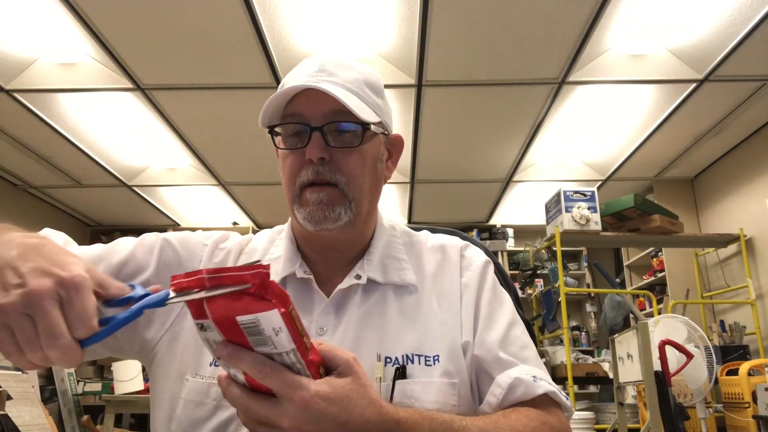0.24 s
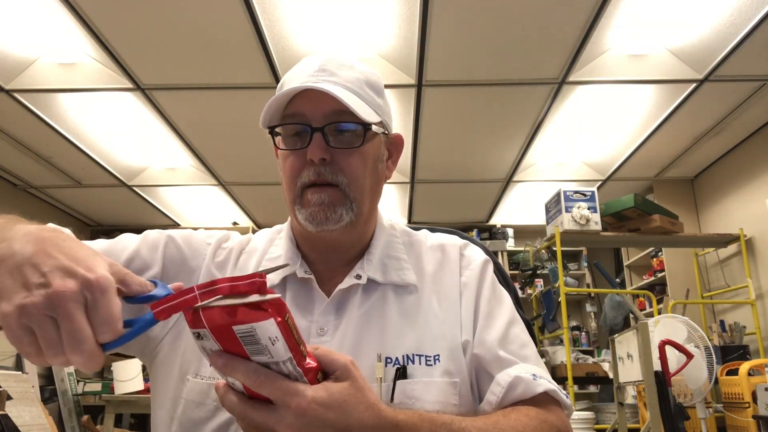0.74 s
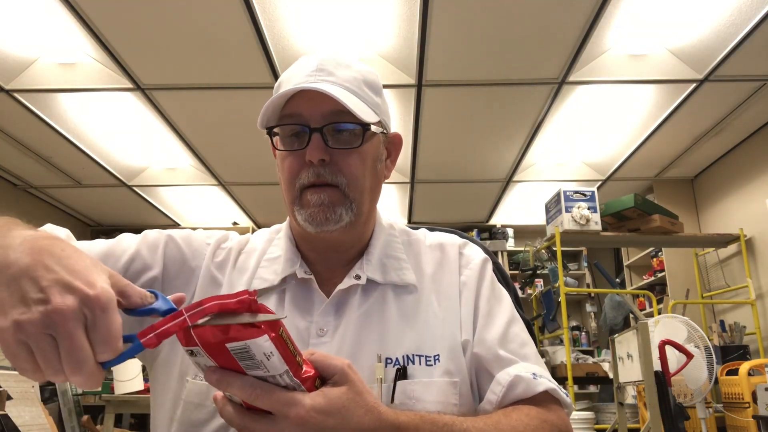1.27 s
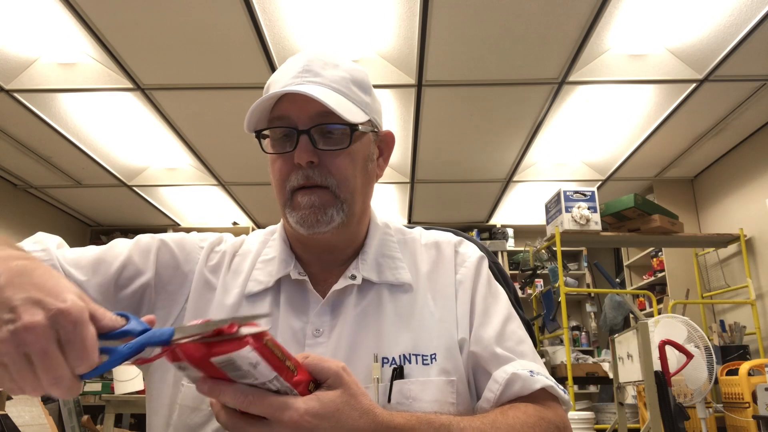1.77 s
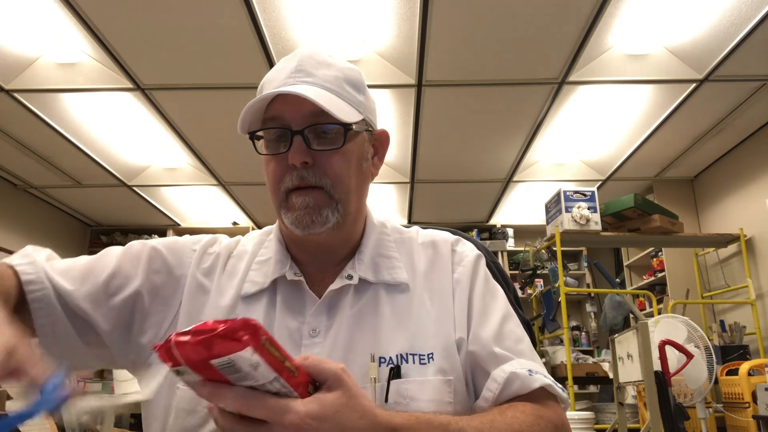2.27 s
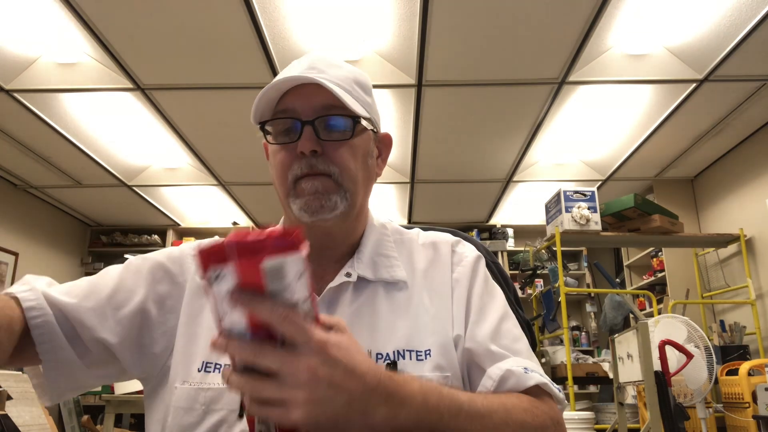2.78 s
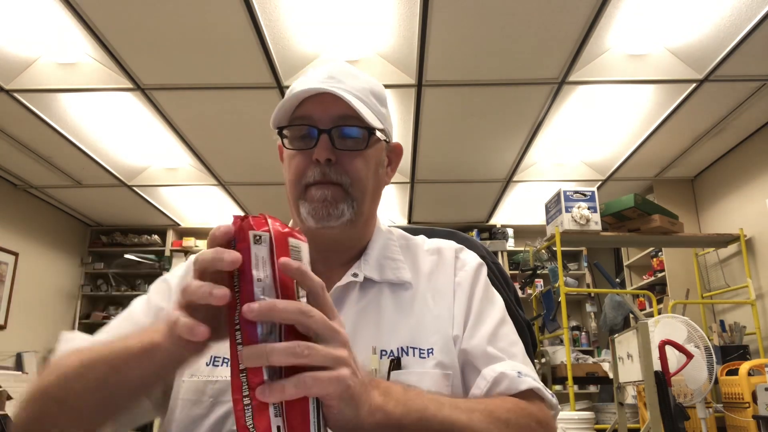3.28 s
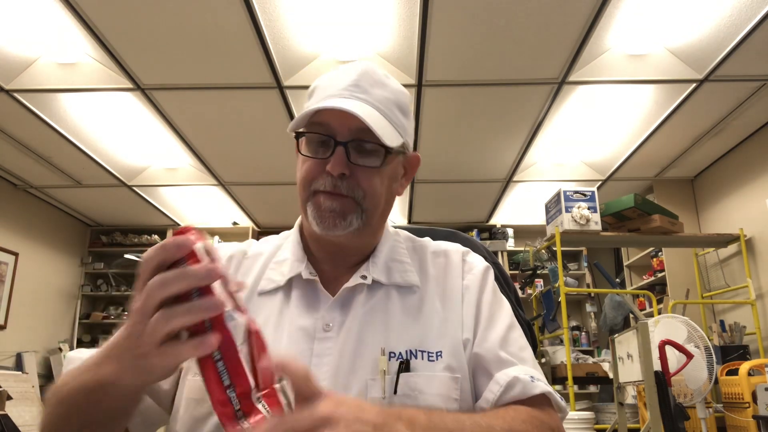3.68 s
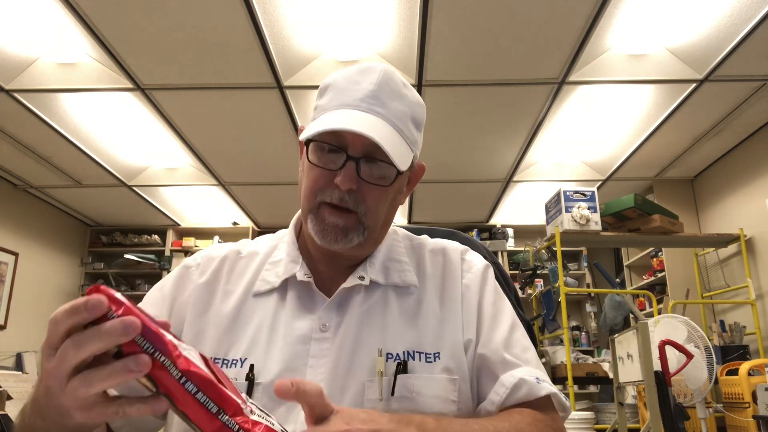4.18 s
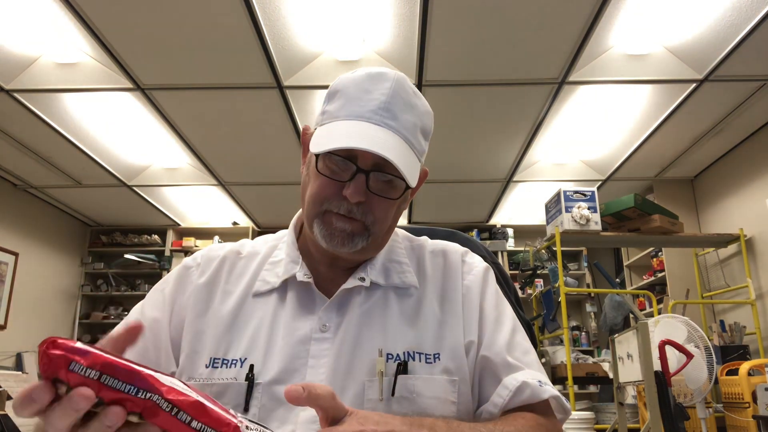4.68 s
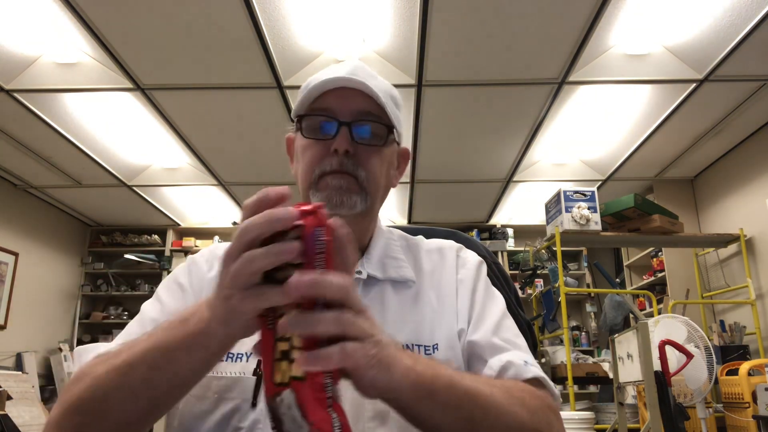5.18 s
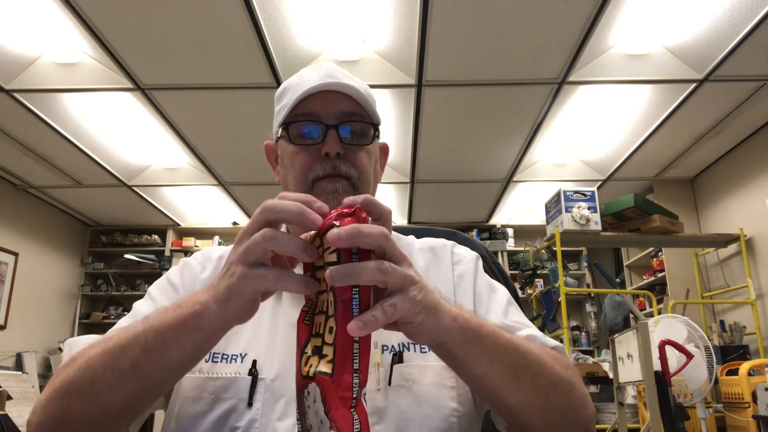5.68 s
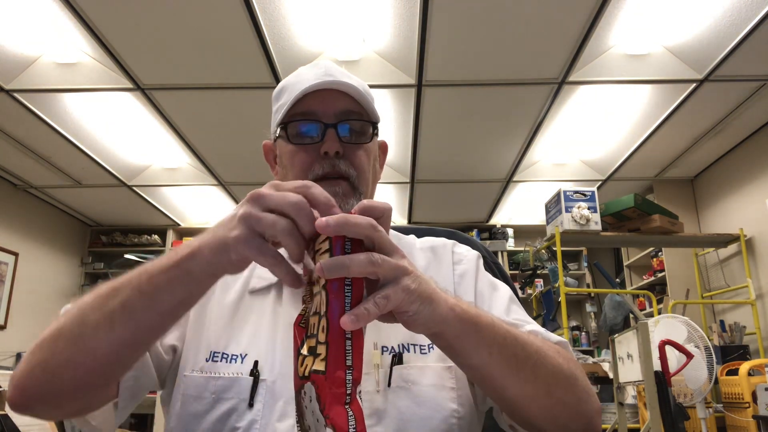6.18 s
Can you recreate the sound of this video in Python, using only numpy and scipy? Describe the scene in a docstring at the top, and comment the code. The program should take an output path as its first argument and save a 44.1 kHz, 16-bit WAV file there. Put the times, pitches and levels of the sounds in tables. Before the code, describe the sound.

A thin, stiff wrapper snaps and rustles near the microphone. At first the creases are sparse, between soft grainy slides of scissor blades, until a short bright cut finishes the seam. After a brief lull, fingers grip, tilt and pick at the packet in continuous uneven bursts of crackle, with small hollow thumps, short indoor reflections and quiet fan hum.

```python
"""A stiff plastic biscuit packet crackles as scissors snip off its top and two hands turn it and pick at it.
Each crease is a buckling instability: an impulse excites a facet and the packet, and bending-wave
dispersion makes it a tiny falling chirp, over a rustle of smaller ones. Shaped noise gives the cuts and
sliding blades, decaying sines the knocks of the tray. A small workshop adds reflections, air and hum."""
import sys
import numpy as np
from scipy import signal
from scipy.fft import rfft, irfft
from scipy.io import wavfile

SR = 44100
rng = np.random.default_rng(int(sys.argv[2]) if len(sys.argv) > 2 else 0)


def to_wav(s):
    """Save 16-bit WAV."""
    ch = np.atleast_2d(s).T  # columns
    pcm = np.round(np.clip(ch, -1, 1) * 32767)  # PCM
    wavfile.write(sys.argv[1], SR, pcm.astype(np.int16))


N = 283947  # samples in the scene

# Loud single creases:
# (time [s], relative level [dB], facet pitch [Hz], relative low ring of the packet [dB])
LOUD_CREASES = [(0.0109, -33.5, 3960, 6), (.023, -23.5, 5300, -13), (0.0572, -37, 3520, -2),
                (0.1465, -43.5, 7500, -8), (0.1749, -43, 3000, -6), (0.333, -37, 4500, 0),
                (0.387, -33, 2170, -3), (0.397, -37, 3100, -2), (0.4014, -35.5, 2440, 1),
                (.4282, -36, 5200, -5), (0.4658, -32, 4970, -12), (0.4757, -34.5, 7500, 0),
                (0.5082, -29, 3500, -3), (0.5458, -40.5, 2800, 4), (0.9098, -42.5, 2520, 8.5),
                (0.9579, -37, 2500, -4), (0.965, -32.5, 2050, -11), (0.9806, -31.5, 3070, -1.5),
                (0.984, -31, 3080, -13), (1.0002, -35, 3680, 0), (1.0103, -35, 3500, -14),
                (1.1046, -29, 2820, -0.5), (1.2172, -49, 2500, -15), (1.26, -53.5, 6100, -12),
                (1.306, -46.5, 2890, 5.5), (1.3628, -34.5, 970, -12), (1.3774, -46, 2080, 0),
                (1.4003, -45, 1600, -8), (1.4412, -44, 3000, -14), (1.466, -29.5, 5950, -2),
                (1.5283, -43, 3050, 2.5), (1.558, -39, 1710, -4), (1.6073, -51, 1700, -10),
                (1.6377, -45, 4580, 3), (1.718, -48, 2680, 4), (1.73, -32, 2100, -14),
                (1.782, -40, 2970, 0), (1.8258, -30.5, 3600, 0), (1.934, -32.5, 4440, -16),
                (1.946, -32, 3600, 4.5), (2.049, -41.5, 3660, -14), (2.131, -49.5, 1670, -42),
                (2.2096, -48, 2040, -15), (2.268, -44, 2560, -8), (2.452, -28, 1930, -23),
                (2.4691, -39.5, 3700, -17), (2.544, -41.5, 1900, -10), (2.5882, -36.5, 1740, 2),
                (2.6237, -31.5, 2520, -10), (2.651, -40, 4000, -18), (2.668, -27.5, 5060, -28),
                (2.6815, -35, 11500, -2), (2.7164, -40, 2600, -14), (2.731, -28.5, 2800, -4.5),
                (2.7646, -38.5, 3700, -17), (2.7907, -39, 2350, -10), (2.987, -36, 3400, -16),
                (3.002, -42, 2500, -12), (3.0272, -37, 2530, -14), (3.04, -32, 3650, -22),
                (3.077, -35, 2450, 4), (3.1743, -30.5, 2340, 0.5), (3.1945, -27, 4750, -3.5),
                (3.295, -40.5, 2580, 7), (3.3678, -35.5, 3900, 4), (3.3827, -30, 3050, -1),
                (3.4032, -36.5, 1900, -6), (3.4614, -33, 4100, -4), (3.4725, -27.5, 3520, -0.5),
                (3.507, -33.5, 1530, -3), (3.5133, -29.5, 4900, -10), (3.5525, -35, 2000, 4),
                (3.5676, -36.5, 1300, -8), (3.688, -27.5, 1900, -1.5), (3.7026, -35.5, 1960, 8),
                (3.7338, -35, 4800, -6), (3.7388, -33, 4220, -1), (3.7684, -37, 3020, -12),
                (3.814, -42, 1910, 13), (3.8313, -38, 2800, -12), (3.8654, -28.5, 6100, -2),
                (3.888, -34, 3200, -24), (3.9529, -28, 1260, -6), (3.999, -34, 3140, -6),
                (4.032, -34.5, 1980, 1), (4.1064, -41, 2200, -8), (4.1371, -38, 4930, 1),
                (4.153, -33.5, 1640, -8), (4.17, -45, 2600, 7), (4.2068, -37, 4600, -1),
                (4.219, -33, 2240, -0.5), (4.2261, -36.5, 3460, -19), (4.2587, -39.5, 3770, -16),
                (4.2886, -43.5, 1600, -7), (4.3397, -42, 1850, -16), (4.3663, -43.5, 4640, -6),
                (4.4641, -32.5, 2070, -5), (4.489, -32.5, 2800, -22), (4.506, -31, 1900, -11),
                (4.543, -36.5, 3300, -1), (4.57, -32.5, 2570, -1.5), (4.633, -36, 2650, -1),
                (4.704, -44.5, 1880, -15), (4.777, -36.5, 2430, 7), (4.8354, -30, 2370, -11),
                (4.8488, -37, 3720, -15), (4.8738, -22.5, 6900, -7.5), (4.8805, -28.5, 4100, -3),
                (4.9276, -37.5, 3970, -23), (4.948, -38, 3100, -10), (4.977, -32.5, 3080, -17),
                (4.9946, -35, 3300, -6), (5.0141, -34.5, 6300, -20), (5.0366, -34, 3600, -9),
                (5.0489, -27, 4230, -18), (5.0628, -31.5, 4450, -3), (5.0893, -29.5, 3630, -4.5),
                (5.0948, -27, 5470, -11), (5.117, -32, 1910, -6), (5.163, -26, 4800, -6.5),
                (5.2694, -30.5, 5730, -12), (5.3012, -35.5, 4400, -14), (5.3117, -36, 1930, 6.5),
                (5.3205, -37, 2000, -9), (5.341, -38.5, 3100, -11), (5.381, -36.5, 2400, -5),
                (5.384, -34, 2400, -10), (5.403, -39, 4900, -18), (5.4165, -35, 3170, -10),
                (5.432, -33, 5900, -1), (5.5043, -41.5, 2700, -14), (5.5262, -26, 2600, -41),
                (5.569, -31, 3940, -3.5), (5.6171, -34, 2660, -49), (5.6546, -33, 3740, -1),
                (5.6617, -40, 3300, -12), (5.6848, -32.5, 4070, -7), (5.722, -32, 5400, -4),
                (5.7385, -31, 3600, -15), (5.893, -33, 4800, 4.5), (5.946, -40, 2400, 0),
                (5.9696, -42, 4200, -14), (6.0032, -37, 3060, -20), (6.0761, -35.5, 1940, -20),
                (6.0846, -33.5, 2970, -0.5), (6.1258, -30, 5100, 0), (6.207, -39.5, 3900, 3.5),
                (6.274, -37.5, 1830, -3), (6.314, -38.5, 3450, 3.5)]
# Blades shearing through the sealed seam: (time [s], length [s], level [dB rms])
SEAM_CUTS = [(.001, 0.0055, -37), (0.966, 0.049, -49.5), (1.798, 0.0099, -43), (1.809, 0.0094, -28.5),
             (1.819, 0.0055, -40)]
# Knocks of the filled tray: (time [s], level [dB], settled pitch [Hz], 60 dB decay time [s])
TRAY_KNOCKS = [(.06, -35, 537, 0.039), (0.394, -39, 510, 0.044), (1.813, -32, 367, 0.031),
               (1.818, -32, 298, 0.04), (1.9473, -31, 453, 0.033), (3.187, -29.5, 320, 0.015),
               (3.191, -27.5, 172, 0.027), (3.19, -46, 81, 0.06), (4.423, -27, 553, 0.0038),
               (4.886, -37, 370, 0.014), (5.893, -34, 473, .03)]
# Film sliding along the blades: (start [s], end [s], level at full swell [dB])
BLADE_SLIDES = [(0.097, 0.264, -61), (0.258, 0.348, -54.5), (0.369, 0.564, -51.5), (0.562, 0.801, -54.5),
                (1.092, 1.186, -51.5), (1.635, 1.693, -62), (1.878, 2.02, -52)]
# Squeezes of the packet, by blades or fingers: (start [s], hold [s], relative rustle level [dB])
SQUEEZES = [(.01, 0.025, -52.5), (0.155, 0.02, -59), (0.303, 0.015, -52), (0.407, 0.046, -56),
            (0.652, 0.074, -56), (0.949, 0.019, -54.5), (1.132, 0.034, -60.5), (1.364, 0.16, -61.5),
            (1.904, 0.06, -48), (2.35, 0.13, -60), (2.545, 0.082, -48), (2.69, 0.079, -51),
            (3.036, 0.038, -52), (3.151, 0.032, -48), (3.284, 0.045, -52), (3.373, 0.19, -48.5),
            (3.662, 0.06, -45), (3.79, 0.17, -53), (3.992, 0.15, -49.5), (4.367, 0.05, -58.5),
            (4.493, 0.06, -44.5), (4.743, 0.11, -56.5), (4.97, 0.067, -49), (5.065, 0.094, -42),
            (5.177, 0.24, -49), (5.488, 0.14, -55), (5.675, 0.1, -48), (5.83, 0.17, -54),
            (5.89, 0.036, -46), (6.074, 0.24, -54), (6.437, .02, -49.5)]
# Spectral shape of the film: (frequency [Hz], relative level [dB])
FILM_TONE = [(100, -49), (330, 7.5), (550, 2), (800, 11.5), (1150, 1.5), (1450, 5), (1800, -1),
             (2300, -4.5), (3500, -2.5), (5000, -5), (7500, -7.5), (8600, -9), (12000, -7.5), (16000, -11)]
# Spectral shape of a cut: (frequency [Hz], relative level [dB])
SHEAR_TONE = [(100, -23), (300, -4), (430, 0.5), (600, -10), (820, 2), (1100, -13), (1500, -2), (1850, -1),
              (2360, -14), (3100, -4.5), (5000, -4.5), (8500, -12), (15000, -20)]
# Spectral shape of the sliding: (frequency [Hz], relative level [dB])
SLIDE_TONE = [(100, -12), (450, 8.5), (1000, -1), (1500, 1), (2300, -11), (3800, -0.5), (6000, -10.5),
              (9000, -12.5), (12000, -14.5), (16000, -16)]
# Spectral shape of the ventilation: (frequency [Hz], relative level [dB])
AIR_TONE = [(25, -27), (58, -4), (100, -4.5), (130, 1), (195, 4.5), (260, -6), (370, -7), (520, -14),
            (1000, -19.5), (2000, -47), (5000, -29.5), (16000, -48)]
# Mains and fan lines: (frequency [Hz], level [dB rms])
HUM_LINES = [(120, -61.5), (166.2, -67), (240, -60.5), (480, -74.5)]
# Spectral shape of the reverberant tail: (frequency [Hz], relative level [dB])
WALL_TONE = [(100, 4), (400, 10), (700, 8.5), (1200, 8), (2200, 5.5), (4000, 7), (8000, 5), (15000, 3.5)]
# Spectral shape of the nearby scatter: (frequency [Hz], relative level [dB])
NEAR_TONE = [(300, -9.0), (4000, -4.5), (16000, -18.5)]

AIR_DB = -54.5  # ventilation, dB rms
GRAIN, LEAD = 512, 64  # samples in one crease, and of those before its snap
PACKET_Q, RING_SPREAD = .85, .25  # resonance of the packet; random spread of its log frequency
SQUEEZE_ATTACK_S, SQUEEZE_RELEASE_S = 0.034, 0.039  # time constants of the grip tightening, film relaxing
RESTING_DB = -68.5  # relative rustle level of the packet merely held
TOP_HZ = 16000  # upper edge of the final band


def undb(db):
    """Decibel law: amplitude gain is ten to the power dB/20."""
    return 10 ** (np.asarray(db) / 20)


def unit(x):
    """Power normalization: scale to rms 1."""
    return x / np.sqrt(np.mean(x ** 2))


def tone(points, hz):
    """Frequency response: gain interpolated in dB over log frequency."""
    table_hz, db = np.transpose(points)
    return undb(np.interp(np.log(hz + 1), np.log(table_hz), db))


def colour(x, points):
    """Linear filtering: the spectrum is multiplied by a tabulated gain."""
    return irfft(rfft(x) * tone(points, np.fft.rfftfreq(len(x), 1 / SR)), len(x))


def add(out, s, sound):
    """Superposition: mix a sound in at time s."""
    i = int(np.clip(s * SR, 0, N - 1))
    out[i:i + len(sound)] += sound[:N - i]


def workshop(waver=0.025):
    """Stationary background: shaped ventilation noise plus sines whose phase wavers (in radians)."""
    t = np.arange(N) / SR
    out = undb(AIR_DB) * unit(colour(rng.standard_normal(N), AIR_TONE))
    for hz, db in HUM_LINES:
        drift = np.interp(t, np.linspace(0, t[-1], 32), rng.standard_normal(32))
        phase = 2 * np.pi * (hz * t + rng.random()) + waver * drift
        out += undb(db) * np.sqrt(2) * np.sin(phase)
    return out


def effort(times):
    """Power summation: squeezes that tighten, hold and relax add to the resting rustle (relative dB)."""
    power = undb(RESTING_DB) ** 2
    for start, hold, db in SQUEEZES:
        before = np.maximum(start - times, 0) / SQUEEZE_ATTACK_S
        after = np.maximum(times - start - hold, 0) / SQUEEZE_RELEASE_S
        power = power + (undb(db) * np.exp(-before - after)) ** 2
    return 10 * np.log10(power)


def buckling(count, gain_db, scatter_db, facet_hz, spread, body_db, tighten=0.0055):
    """Tension raises pitch: random creases grow louder and higher as harder handling pulls the film taut."""
    times = (np.arange(count) + rng.uniform(0, 2, count)) * N / SR / count
    size, pitch, ring = np.clip(rng.standard_normal((count, 3)), -2, 2).T
    effort_db = effort(times)
    tension = tighten * (effort_db - np.median(effort_db))
    hz = np.clip(facet_hz * np.exp(spread * pitch + tension), 700, 12500)
    return times, effort_db + gain_db + scatter_db * size, hz, body_db + 3 * ring


def snaps(times, db, facet_hz, body_db, q, flutter, flutter_s, bend_s, reach, creep=0.2, creep_s=0.00032,
          slip=0.34, body_hz=560, body_lag_s=0.001433, second=0.7, step_s=0.000498):
    """Dispersive impulse response: a kick excites facet and packet, and bending waves bring the lows late."""
    t, f = (np.arange(GRAIN) - LEAD) / SR, np.fft.rfftfreq(GRAIN, 1 / SR) + 1

    # the fold creeps, snaps, and the kick echoes between neighbouring folds
    creeping = creep * np.exp(-abs(t) / creep_s)
    fluttering = flutter * np.exp(-abs(t) / flutter_s)
    kick = np.where(t < 0, creeping, fluttering) * rng.standard_normal((len(times), GRAIN))
    kick[:, LEAD] = 1

    # folds give way in two steps; their gap and the second's share colour each snap differently
    gap, share = rng.random((len(times), 2)).T
    gap_s = (step_s * (.5 + gap))[:, None]
    steps = 1 + (second * share)[:, None] * np.exp(-2j * np.pi * f * gap_s)

    # a large facet turns over slowly, so its treble ends a few multiples above its pitch
    ratio = f / facet_hz[:, None]
    resonance = 1 / (1 + 1j * q * (ratio - 1 / ratio))
    facet = resonance / (1 + 1j * np.sqrt(2) * ratio / reach - (ratio / reach) ** 2)
    # well below its pitch the air just slips round the facet
    facet = facet / (1 - 1j * slip / ratio)

    detune = np.exp(rng.uniform(-RING_SPREAD, RING_SPREAD, (len(times), 1)))
    ratio = f / (body_hz * detune)
    body = np.exp(-2j * np.pi * f * body_lag_s) / (1 + 1j * PACKET_Q * (ratio - 1 / ratio))

    # delay is bend_s at 1 kHz and goes as one over the root of frequency
    spread = np.exp(-4j * np.pi * bend_s * np.sqrt(f * 1000))
    bent = rfft(kick) * steps * spread * tone(FILM_TONE, f)
    film, packet = (irfft(bent * shape) for shape in (facet, body))
    film, packet = (v / np.linalg.norm(v, axis=1, keepdims=True) for v in (film, packet))
    waves = undb(db)[:, None] * (film + undb(body_db)[:, None] * packet)
    out = np.zeros(N)
    for s, wave in zip(times, waves):
        add(out, s - LEAD / SR, wave)
    return out


def rustle():
    """Statistical superposition: a dense bed of tiny creases of random size and pitch."""
    folds = buckling(count=1600, gain_db=18.5, scatter_db=4.5, facet_hz=3320, spread=0.59, body_db=-7)
    return snaps(*folds, q=1.06, flutter=0.07, flutter_s=0.0042, bend_s=0.001247, reach=2.2)


def crackle():
    """Sparse random impulses: a few dozen middling creases a second stand out of each squeeze."""
    folds = buckling(count=260, gain_db=21.5, scatter_db=3.0, facet_hz=3280, spread=0.41, body_db=-3.5)
    return snaps(*folds, q=1.3, flutter=0.074, flutter_s=0.0027, bend_s=0.001004, reach=2.6,
                 creep=0.19, creep_s=0.00063)


def scissors(grit_db=5):
    """Fracture noise: blades break the seam in a rush of tiny fractures of random strength."""
    out = np.zeros(N)
    for s, length, db in SEAM_CUTS:
        n = int(length * SR)
        strength = undb(grit_db * rng.standard_normal(n))
        fractures = rng.standard_normal(n) * strength
        cut = colour(fractures, SHEAR_TONE) * np.sqrt(np.hanning(n))
        add(out, s, undb(db) * unit(cut))
    return out


def creases(gain_db=17, ring_db=-5, reach=4.2, sharpen=0.41):
    """Snap-through buckling: single loud folds, brighter the harder they let go."""
    s, db, hz, body_db = np.transpose(LOUD_CREASES)
    reaches = reach * undb(sharpen * (db - np.median(db)))[:, None]
    return snaps(s, db + gain_db, hz, body_db + ring_db, q=1.22, flutter=0.058, flutter_s=0.0026,
                 bend_s=0.000908, reach=reaches)


def tray(sag=0.11, sag_s=0.00068):
    """Damped oscillation: short knocks whose pitch sinks as the plastic gives."""
    out, t = np.zeros(N), np.arange(SR // 10) / SR
    for s, db, hz, t60 in TRAY_KNOCKS:
        # pitch starts a fraction sag above its settled value
        phase = 2 * np.pi * hz * (t + sag * sag_s * (1 - np.exp(-t / sag_s)))
        add(out, s, undb(db) * np.sin(phase) * np.exp(-np.log(1000) * t / t60))
    return out


def slides(rise=0.24, release=0.035, grain_db=3.5):
    """Friction noise: a soft, grainy hiss swells as the blades slide and stops when they grip."""
    out = np.zeros(N)
    catches = np.repeat(rng.standard_normal(N // LEAD + 1), LEAD)[:N]
    hiss = unit(colour(rng.standard_normal(N) * undb(grain_db * catches), SLIDE_TONE))
    for start, end, db in BLADE_SLIDES:
        # rise and release are fractions of the slide
        progress = (np.arange(N) / SR - start) / (end - start)
        out += undb(db) * np.clip(np.minimum(progress / rise, (1 - progress) / release), 0, 1)
    return out * hiss


def answer(wet_db=-11.0, t60_low=0.28, t60_high=0.27, build_s=0.0017, near_db=-13, near_s=0.002):
    """Room impulse response: scatter from hands, chest and bench, plus a tail losing treble slightly sooner."""
    t = np.arange(SR // 2) / SR
    low, high = (signal.sosfilt(signal.butter(2, 4500, side, fs=SR, output="sos"),
                                rng.standard_normal(len(t))) for side in ("low", "high"))
    tail = low * np.exp(-np.log(1000) * t / t60_low) + high * np.exp(-np.log(1000) * t / t60_high)
    tail = colour(tail * (1 - np.exp(-t / build_s)), WALL_TONE)
    near = colour(rng.standard_normal(len(t)) * np.sqrt(t) * np.exp(-t / near_s), NEAR_TONE)
    return undb(wet_db) * tail / np.linalg.norm(tail) + undb(near_db) * near / np.linalg.norm(near)


def room(x, count=32):
    """Time-varying convolution: the packet keeps moving, so each span stirs a different reflection pattern."""
    out = x.copy()
    for span in np.array_split(np.arange(N), count):
        add(out, span[0] / SR, signal.fftconvolve(x[span], answer()))
    return out


def scene():
    """Radiation efficiency: thin film radiates little bass, so it is high-passed above the tray's limit."""
    film = creases() + crackle() + rustle() + scissors() + slides()
    film = signal.sosfilt(signal.butter(2, 170, "high", fs=SR, output="sos"), film)
    knocks = signal.sosfilt(signal.butter(2, 65, "high", fs=SR, output="sos"), tray())
    return (room(film + knocks) + workshop())[None]


def record(dry):
    """Band limiting: a steep elliptic low-pass cuts the top."""
    return signal.sosfilt(signal.ellip(10, .2, 70, TOP_HZ, fs=SR, output="sos"), dry)


dry = scene()
out = record(dry)
to_wav(out)
```